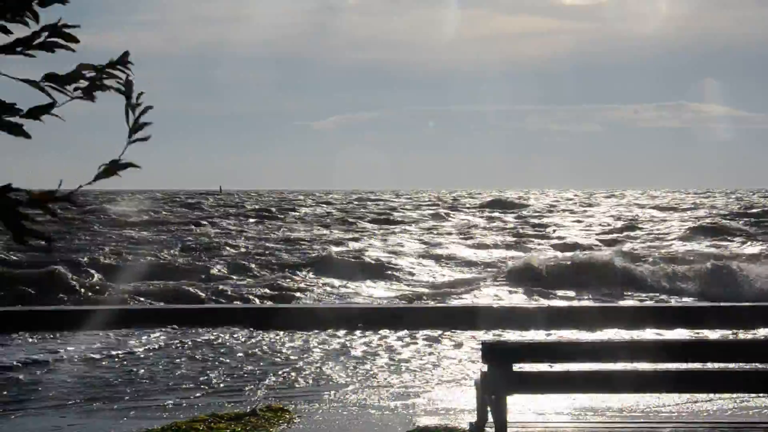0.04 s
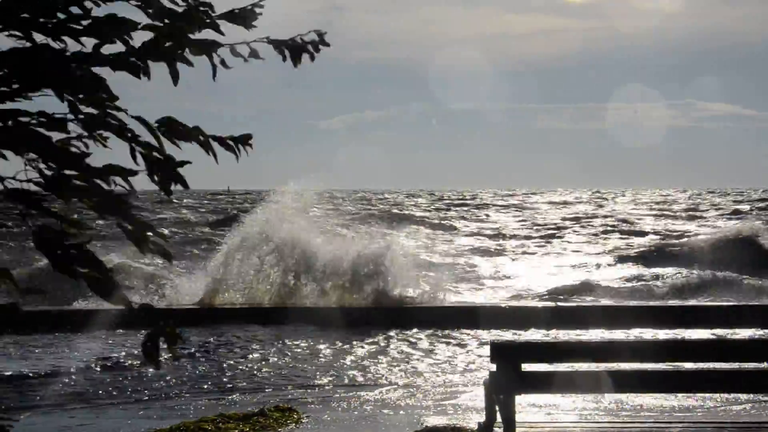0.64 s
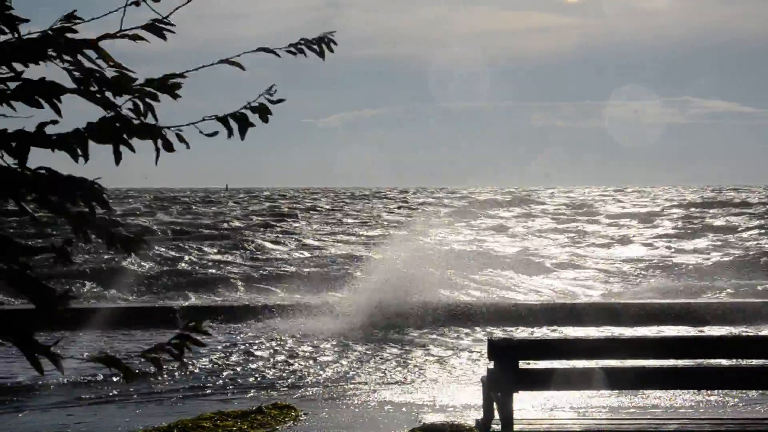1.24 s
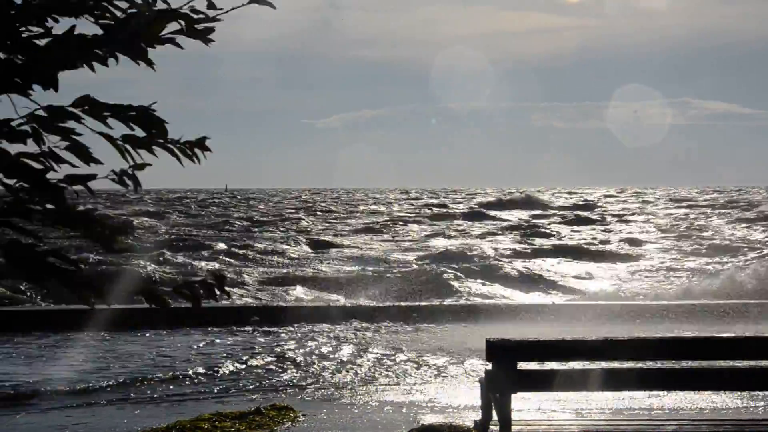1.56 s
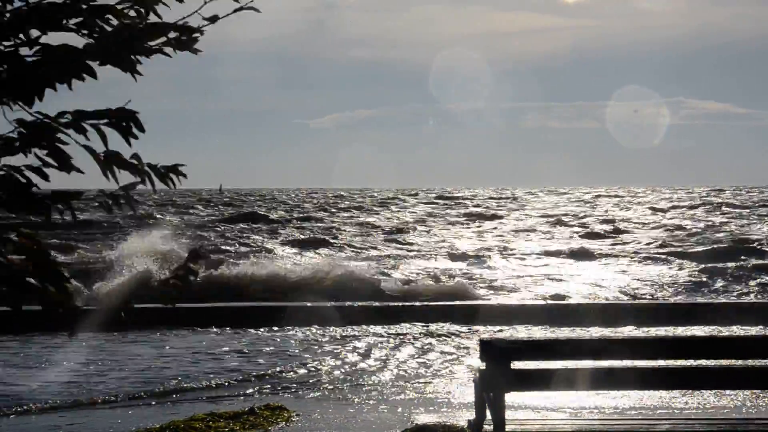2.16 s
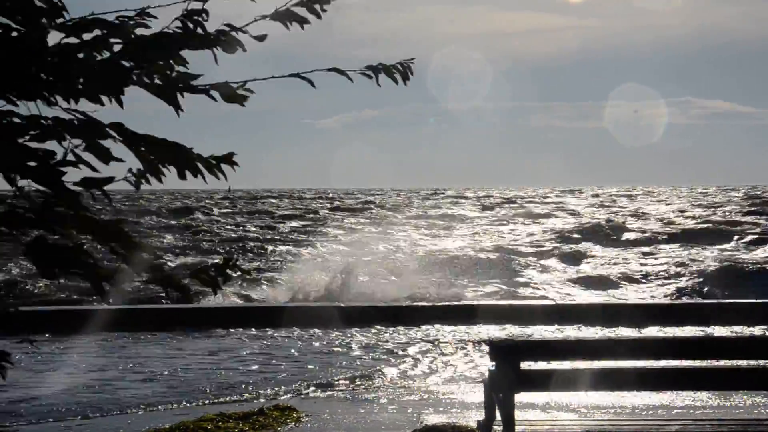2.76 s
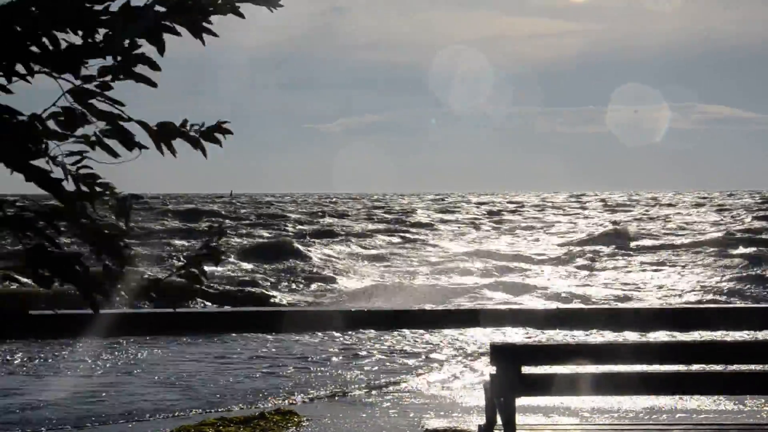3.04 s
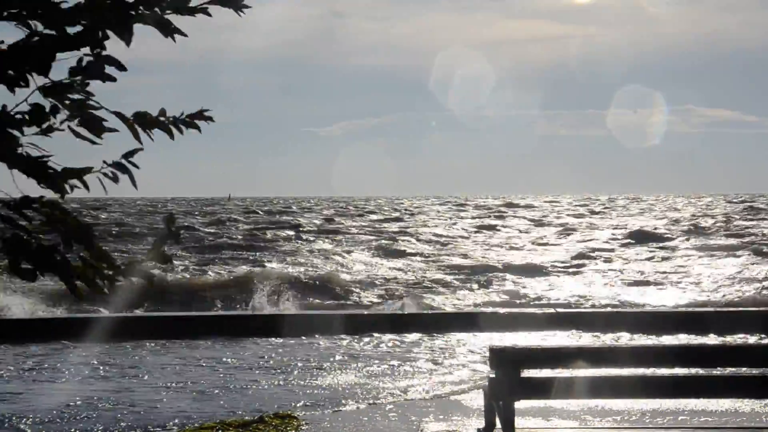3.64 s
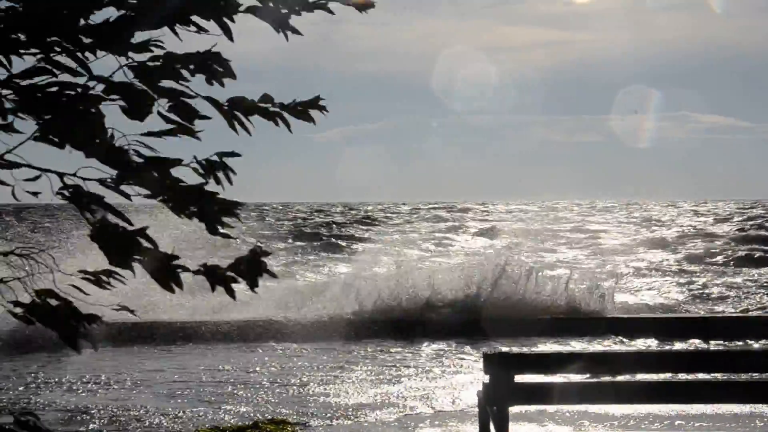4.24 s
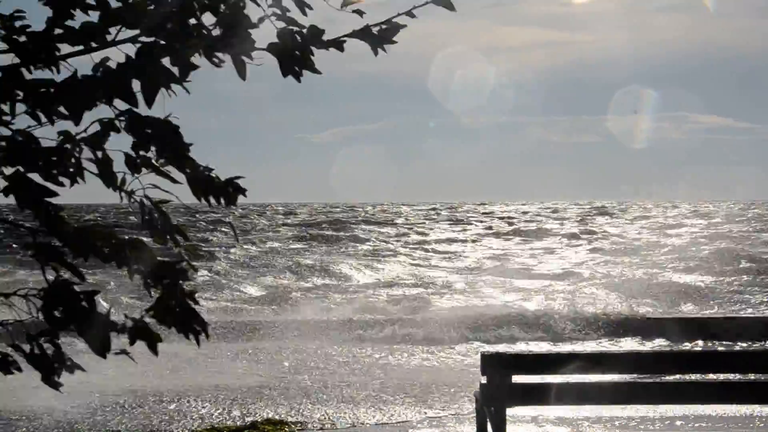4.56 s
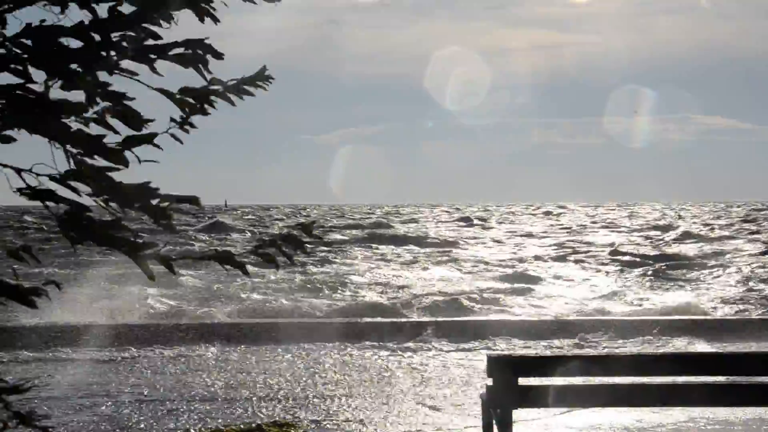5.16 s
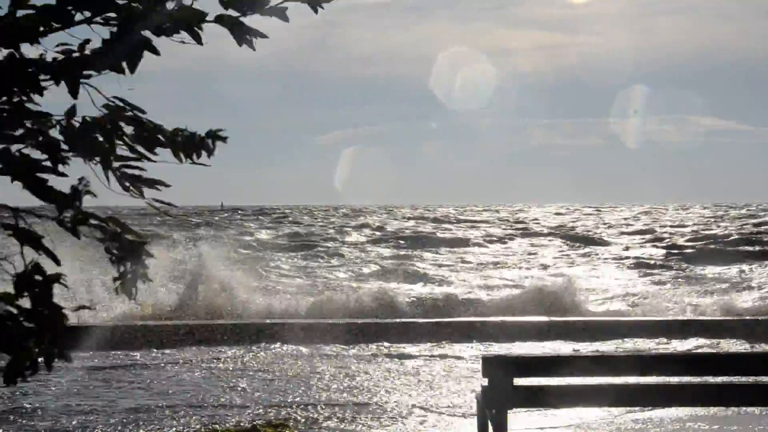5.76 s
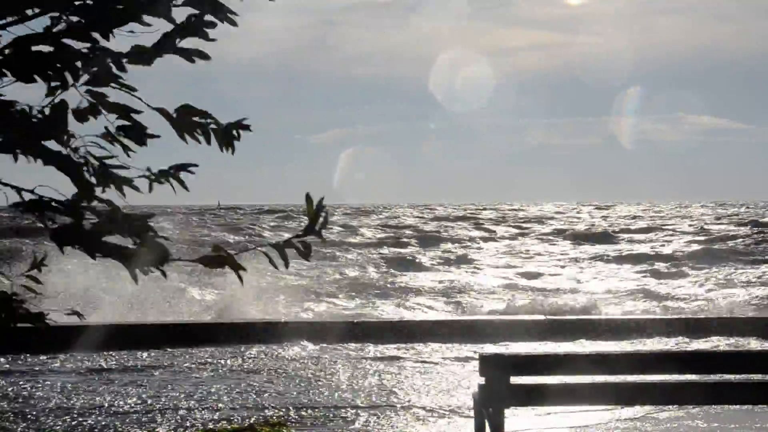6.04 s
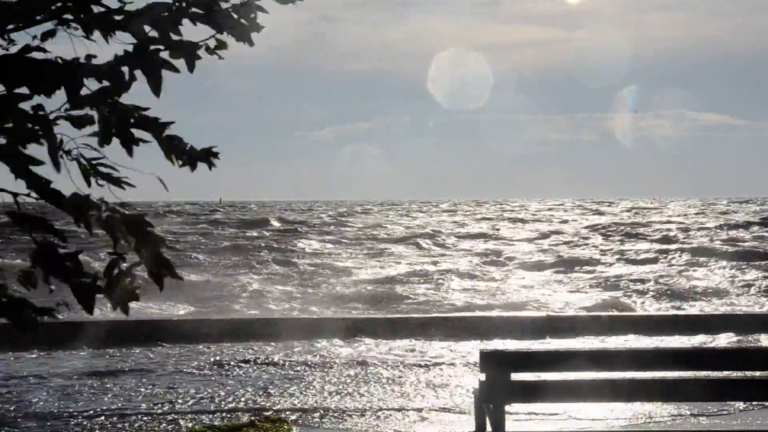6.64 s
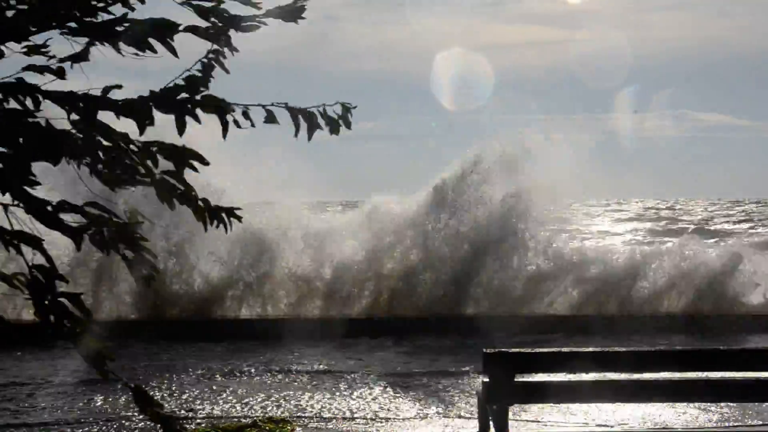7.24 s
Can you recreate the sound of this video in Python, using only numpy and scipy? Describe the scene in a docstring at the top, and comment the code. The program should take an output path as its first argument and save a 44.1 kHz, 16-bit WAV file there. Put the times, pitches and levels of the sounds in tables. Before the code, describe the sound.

Close, deep wind rumble and irregular thuds batter the microphone on an open seafront, with the continuous wash of stormy waves behind. The wind leans left at first, then shifts right and turns into ragged, rasping gusts with sharp snaps. Short lulls break up the buffeting, and the strongest blasts push the sound of the sea down for a moment before it returns.

```python
"""Storm surf and gale at a seawall

Surf roars as a steady wash with a hard ring near 2 kHz. A gale blows straight onto a small stereo
microphone: it rumbles on the ports, tears in gusts, drops into lulls and breaks into thumps, buffets
and pops. Each hard push makes the gain control duck everything; the surf then swells back."""
import sys
import numpy as np
from scipy import signal
from scipy.fft import rfft, irfft
from scipy.io import wavfile
from scipy.ndimage import uniform_filter1d, minimum_filter1d

SR = 44100
rng = np.random.default_rng(int(sys.argv[2]) if len(sys.argv) > 2 else 0)


def pcm_store(signal):
    """Save signal as 16-bit PCM."""
    levels = np.round(np.clip(np.atleast_2d(signal), -1, 1) * 32767)
    wavfile.write(sys.argv[1], SR, levels.astype(np.int16).T)


N = 325899
TIME_S = np.arange(N) / SR
FREQ_HZ = np.fft.rfftfreq(N, 1 / SR)


def from_db(db):
    """Decibels to amplitude."""
    return 10 ** (np.asarray(db) / 20)


def unit_rms(x):
    """Scales to rms 1."""
    return x / np.sqrt(np.mean(x ** 2) + 1e-20)


def curve(rows, column=1):
    """One column of a time table, at every sample."""
    rows = np.array(rows)
    return np.interp(TIME_S, rows[:, 0], rows[:, column])


def spectrum(rows, column=1):
    """One column of a frequency table, interpolated on a log axis."""
    rows = np.array(rows)
    return np.interp(np.log(FREQ_HZ + 1), np.log(rows[:, 0] + 1), rows[:, column])


def lowpass(x, corner_hz, order):
    """Zero-phase low-pass."""
    return irfft(rfft(x) / (1 + (FREQ_HZ / corner_hz) ** order), N)


def wander(rate_hz):
    """Smooth random drift of rms 1, rolling off above the rate."""
    return unit_rms(irfft(rfft(rng.standard_normal(N)) * np.exp(-(FREQ_HZ / rate_hz) ** 2), N))


def port_noise(colour_db, coherence, left_lead_rad=0):
    """Coloured noise of rms 1, partly shared by the two ports."""
    left, other = rfft(rng.standard_normal((2, N)))
    right = (coherence * left + np.sqrt(1 - coherence ** 2) * other) * np.exp(-1j * left_lead_rad)
    return unit_rms(irfft(np.array([left, right]) * from_db(colour_db), N))


def steady(x, span_samples):
    """Holds the power at 1 over the span and keeps faster detail."""
    window = np.hanning(span_samples)
    power = signal.fftconvolve((np.atleast_2d(x) ** 2).mean(0), window / window.sum(), "same")
    return x / np.sqrt(abs(power) + 1e-6)


def pan(left_minus_right_db):
    """Left and right gains for a level difference."""
    return from_db(np.array([[1], [-1]]) * left_minus_right_db / 2)


# Electrical tones. Each row: frequency in Hz, level in dB.
WHINE_TONES = [(14910, -91), (14970, -83), (15030, -82), (15090, -91)]


def whine(level_db=1, side_db=-13):
    """Close, faint, steady tones from the electronics."""
    tones = sum(from_db(db) * np.sqrt(2) * np.sin(2 * np.pi * hz * TIME_S) for hz, db in WHINE_TONES)
    return tones * from_db(level_db) * pan(side_db)


# Surf spectrum. Each row: frequency in Hz, left and right relative density in dB.
SURF_SPECTRUM = [(60, -60.5, -57.5), (247, -55, -52), (700, -57.5, -57), (1070, -57.5, -56.5),
                 (1530, -56.5, -54), (1902, -53, -48.5), (2670, -66, -61), (3140, -62, -62.5),
                 (4300, -70.5, -75.5), (5490, -76, -88), (6970, -81, -91.5), (9170, -90.5, -89.5),
                 (9630, -102, -102), (10600, -106, -105), (13800, -107, -96.5), (15600, -114, -103)]
# Surf across the ports. Each row: frequency in Hz, coherence 0-1, left lead in radians.
SURF_STEREO = [(200, 0.99, 0), (1000, 0.94, 0), (2160, 0.98, 0), (2720, 0.72, 0), (3320, 0.58, 0.44),
               (4270, 0.7, 1.52), (6000, 0.7, 1.16), (7500, 0.2, 1.5), (8700, 0.08, 0.53), (12900, 0, 1.9)]
# Surf loudness over time, with quick rises and dips. Each row: time in seconds, relative level in dB.
SURF_LEVELS = [(0, 5), (.45, -3), (.58, 0), (.75, 0), (.85, 2), (1.05, -1.9), (1.33, 3), (1.5, 1.5),
               (1.7, -0.8), (1.95, 1.3), (2.2, 0.9), (2.325, 2.4), (2.42, 2.2), (2.6, -.6), (2.73, -2.9),
               (2.8, -1.8), (3.1, -2), (3.25, -1), (3.55, -1.1), (3.72, 0), (3.86, 1.5), (4.1, 0.7),
               (4.9, -0.2), (5.1, -3), (5.25, 4), (5.5, 0), (5.8, 1), (6.05, 1.6), (6.22, 1), (6.35, -3),
               (6.55, 0.2), (7.1, 0), (7.29, 2.3), (7.36, 6.3)]
# Spray over the wall. Each row: time in seconds, treble gain in dB.
SPRAY_TREBLE = [(0, 0.5), (1.2, -1.7), (2.2, -0.5), (3.2, -1.5), (4.4, -0.5), (5.2, 0.5), (6.2, 0.5),
                (7.3, 0.5)]


def surf(level_db=-21, seethe_db=0.76, patchy_db=0.88, spray_hz=3600):
    """Countless bubbles merge into a wash; foam flares up in different bands and spray adds hiss."""
    colour_db = np.array([spectrum(SURF_SPECTRUM, 1), spectrum(SURF_SPECTRUM, 2)])
    wash = port_noise(colour_db, spectrum(SURF_STEREO, 1), spectrum(SURF_STEREO, 2))
    bands = signal.stft(wash, nperseg=512)[2]
    patches = uniform_filter1d(rng.standard_normal(bands.shape[1:]), size=7, axis=0)
    patches = unit_rms(uniform_filter1d(patches, size=12, axis=1))
    foam = unit_rms(signal.istft(bands * from_db(patchy_db * patches))[1][:, :N])
    body = lowpass(foam, spray_hz, order=6)
    roar = body + (foam - body) * from_db(curve(SPRAY_TREBLE))
    return roar * from_db(level_db + curve(SURF_LEVELS) + seethe_db * wander(rate_hz=21))


# Wind strength. Each row: time in seconds, rumble level in dB, flutter level in dB.
WIND_LEVELS = [(0.3, -12, -21.5), (0.62, -14, -23), (0.95, -9.5, -22), (1.25, -14, -25), (1.5, -15.5, -24),
               (2.31, -12.5, -21), (2.38, -9, -19), (2.9, -9.5, -21.5), (3.1, -12, -23.5), (3.88, -17, -24),
               (3.98, -9.5, -21.5), (4.4, -9, -14.5), (4.98, -9.5, -22), (5.19, -13.5, -38),
               (5.33, -6.5, -13), (5.6, -7.5, -12.5), (5.73, -11.5, -20.5), (6.2, -11.5, -15),
               (6.52, -11.5, -23), (6.95, -10.5, -21), (7.33, -9.5, -18.5)]
# Veer and eddy size. Each row: time in seconds, left minus right in dB, deep bass gain in dB.
WIND_VEER = [(.3, 4.5, 4), (.8, 6, 2.5), (1.3, 1.5, 8), (2.3, 5.5, 8), (2.8, 1.5, 4.5), (3.8, 3.3, 8),
             (4.2, -6.5, -3.5), (4.8, -4, -0.5), (5.3, -4.5, 4), (6.2, -3, -6), (7.3, -2.5, 4.5)]
# Large-eddy spectrum. Each row: frequency in Hz, relative density in dB.
RUMBLE_SPECTRUM = [(8, -24), (16, -18.5), (38, -4), (70, -2.5), (120, -7.5), (170, -11.5), (280, -20),
                   (500, -33.5), (1200, -97)]


def rumble(level_db=-1.5, lumpy_db=6, deep_hz=52, right_cut_hz=34, right_db=1):
    """Large slow eddies push in lumps and veer with the wind; the right port passes less deep bass."""
    push = port_noise(spectrum(RUMBLE_SPECTRUM), coherence=0.72)
    push *= from_db(lumpy_db * wander(rate_hz=20.3))
    push = steady(push, span_samples=3500) * from_db(level_db + curve(WIND_LEVELS, 1))
    deep = lowpass(push, deep_hz, order=4)
    left, right = (push - deep + deep * from_db(curve(WIND_VEER, 2))) * pan(curve(WIND_VEER, 1))
    right = irfft(rfft(right) * FREQ_HZ / np.hypot(FREQ_HZ, right_cut_hz), N)
    return np.array([left, from_db(right_db) * right])


# Spectrum of fully torn flow. Each row: frequency in Hz, relative density in dB.
TORN_SPECTRUM = [(60, -15.5), (160, 2), (350, -1), (600, -4.5), (900, -10), (1400, -15), (1900, -16.5),
                 (2500, -32), (3300, -36.5), (5000, -58), (9000, -82.5)]


def flutter(level_db=1.3, ragged_db=2.5, dull_hz=390, tearing_db=-14.5):
    """Smaller eddies shed in clumps: dull flapping when weak, tearing into the midrange when strong."""
    clumps = steady(from_db(ragged_db * wander(rate_hz=50)), span_samples=3500)
    force = clumps * from_db(level_db + curve(WIND_LEVELS, 2))
    bright = steady(port_noise(spectrum(TORN_SPECTRUM), coherence=0.81), span_samples=450)
    dull = lowpass(bright, dull_hz, order=2)
    tearing = 1 - np.exp(-force / from_db(tearing_db))
    return force * (dull + tearing * (bright - dull))


# Brief changes in the wind. Each row: centre in seconds, gain in dB, half-width in seconds.
WIND_LULLS = [(0.505, -4.5, 0.1), (0.924, 3, 0.012), (1.132, -3, 0.014), (1.216, -7, 0.0072),
              (1.272, -7, 0.018), (1.512, -15, 0.019), (1.64, -3, 0.013), (1.887, -6, 0.039),
              (2.447, -2, 0.0081), (2.548, -7, 0.018), (2.67, -12, .012), (2.77, 4, 0.0068),
              (2.846, -5, 0.014), (2.945, -6, .012), (3.086, -7.5, 0.029), (3.61, -7, 0.015),
              (3.777, -2, 0.019), (4.137, -4, .01), (4.22, -7, 0.0091), (4.289, -7, .012),
              (4.381, -5, 0.0084), (4.482, -12, 0.012), (4.604, -8.5, .012), (4.71, -10, 0.017),
              (5.103, -10, 0.06), (5.454, -5, .014), (5.768, -5, 0.0096), (5.922, -10, 0.023),
              (6.068, -3, .012), (6.495, -5.5, 0.041), (6.691, -4, 0.012), (6.853, -10.5, 0.021),
              (7.168, -17, 0.015), (7.26, -4.5, 0.009), (7.308, -10, 0.051)]


def lull_gain():
    """The wind drops away for a moment or, rarely, surges."""
    return from_db(sum(db * np.exp(-((TIME_S - centre_s) / width_s) ** 2)
                       for centre_s, db, width_s in WIND_LULLS))


# Single large eddies. Each row: centre in seconds, level in dB, swing in Hz.
THUMP_EDDIES = [(0.592, -7, 74), (0.669, -5.5, 79), (0.733, -2, 74), (.802, -10.5, 66), (0.875, 4.5, 82),
                (.998, -5, 94), (1.084, 3, 111), (1.166, -0.5, 107), (1.335, -5.5, 115), (1.386, -7.5, 63),
                (1.454, -8.5, 91), (1.595, -5, 70), (1.668, -5.5, 100), (1.776, 3, 83), (1.997, -1, 83.5),
                (2.058, -6.5, 83), (2.123, -16, 70), (2.18, -2, 88.5), (2.22, -7, 84), (2.339, 8.5, 78.4),
                (2.41, -1.5, 68.5), (2.477, 2, 87), (2.632, 0.5, 75.4), (2.754, 1, 69), (2.866, -5, 81),
                (2.9, -3.5, 96), (2.98, 0.5, 105), (3.173, -1, 107), (3.217, -11, 80), (3.321, -1.5, 86),
                (3.397, -3.5, 70), (3.492, -11, 95), (3.659, -6, 76), (3.712, -2, 97), (3.835, -7, 75),
                (3.897, -14, 98), (3.943, -8, 89), (4.197, -4.5, 96), (4.24, -2, 103), (4.274, -9.5, 130),
                (4.334, -4, 106), (4.658, -4.5, 91), (4.751, -6.5, 97), (4.789, -8.5, 120), (4.858, -5, 88),
                (4.933, -4, 118), (4.985, -3.5, 86), (5.218, -2, 78), (5.27, -2, 85), (5.369, -1.5, 114),
                (5.393, 3.5, 85), (5.484, -3.5, 123), (5.545, -3.5, 99), (5.599, 4, 98), (5.749, -4, 119),
                (5.849, -0.5, 110), (5.984, -7, 91), (6.093, -13, 144), (6.146, -3.5, 144),
                (6.218, -6, 154), (6.273, -3.5, 109), (6.371, -10, 137), (6.606, -1.5, 88),
                (6.665, -4, 103), (6.763, -8, 93), (6.813, -7, 88), (6.912, -3.5, 105), (6.971, -6, 111),
                (7, -6, 103), (7.038, -1.5, 97), (7.119, -8, 111), (7.204, -3, 93), (7.229, 2, 100),
                (7.29, -6, 77)]


def thumps(width_cycles=0.53, skew_rad=0.92, veer_share=0.9):
    """Each large eddy swings the pressure once or twice; the lee port gets it weaker and out of step."""
    out = np.zeros((2, N))
    draws = rng.uniform(-0.89, 1, (len(THUMP_EDDIES), 2))
    for (centre_s, db, hz), (half_turns, skew) in zip(THUMP_EDDIES, draws):
        width_s = width_cycles / hz
        near = abs(TIME_S - centre_s) < 3 * width_s
        t = TIME_S[near] - centre_s
        phase = 2 * np.pi * hz * t + np.pi * half_turns + skew_rad * skew * np.array([[1], [-1]])
        envelope = 0.5 ** (2 * (t / width_s) ** 2)
        out[:, near] += from_db(db) * np.sqrt(2) * envelope * np.sin(phase)
    sides = pan(veer_share * curve(WIND_VEER, 1))
    return out * sides / sides.max(0)


# Gust and buffet spectrum before the low-pass. Each row: frequency in Hz, relative density in dB.
PUFF_SPECTRUM = [(60, -18.5), (160, 2.5), (350, -0.5), (700, -4.5), (1400, -5.5), (1900, -5), (2500, -11.5),
                 (3300, -19), (5000, -38.5), (9000, -57.5)]


def turbulence(air, reach_hz):
    """Torn air of steady power; the smaller the eddies, the higher it reaches."""
    return steady(signal.lfilter(*signal.butter(2, reach_hz, fs=SR), air), span_samples=450)


# Tearing gusts. Each row: start in seconds, end in seconds, level in dB, reach in Hz.
GUST_SPANS = [(3.94, 4.124, -9.5, 600), (4.171, 4.204, -10.5, 850), (4.243, 4.374, -16, 600),
              (4.496, 4.518, -7.5, 554), (4.543, 4.563, -6.5, 1300), (4.749, 4.85, -13, 690),
              (4.925, 4.987, -13.5, 700), (5.266, 5.335, -12.5, 503), (5.496, 5.638, -11.5, 795),
              (5.813, 5.889, -11, 636), (6.085, 6.205, -17.5, 600), (6.215, 6.295, -18.5, 650),
              (6.4, 6.446, -15.5, 650), (6.62, 6.68, -19.5, 700), (6.89, 6.94, -12.5, 450),
              (6.99, 7.028, -11.5, 700)]


def gusts(level_db=-1.2, edge_s=0.0035, ragged_db=6, swing_db=2):
    """The flow tears loose from the ports, rattles while the gust holds, and settles again."""
    air = port_noise(spectrum(PUFF_SPECTRUM), coherence=0.76)
    out = np.zeros((2, N))
    for start_s, end_s, db, reach_hz in GUST_SPANS:
        near = (TIME_S > start_s - 10 * edge_s) & (TIME_S < end_s + 10 * edge_s)
        t = TIME_S[near]
        hold = (np.tanh((t - start_s) / edge_s) - np.tanh((t - end_s) / edge_s)) / 2
        out[:, near] += from_db(level_db + db) * hold * turbulence(air[:, near], reach_hz)
    rattle = from_db(ragged_db * wander(rate_hz=140)) * pan(swing_db * wander(rate_hz=20))
    return out * steady(rattle, span_samples=2200)


# Fast eddies. Each row: peak in seconds, level in dB, width in seconds, reach in Hz.
BUFFET_EDDIES = [(0.884, -1, 0.0093, 420), (0.961, -7.5, 0.011, 200), (1.163, -6.5, 0.0061, 250),
                 (1.328, -15, 0.0091, 555), (1.433, -12.5, 0.014, 500), (1.664, -14.5, 0.021, 450),
                 (1.776, -3.5, 0.014, 1000), (1.987, -13.5, 0.0056, 406), (2.458, -5.5, 0.008, 182),
                 (2.513, -5, 0.0068, 280), (2.603, -8.5, 0.004, 200), (2.702, -6, 0.004, 220),
                 (2.792, -3.5, 0.0098, 704), (2.828, -10, 0.014, 497), (2.898, -8, 0.0047, 403),
                 (3.428, -9.5, 0.0087, 380), (3.69, -10, 0.0077, 238), (4.02, -5.5, 0.0048, 500),
                 (4.15, -14, 0.0086, 550), (4.111, -12, .007, 1000), (4.338, -6, 0.0085, 550),
                 (4.361, -10, 0.0058, 600), (4.406, -7.5, 0.0058, 650), (4.417, -4.5, 0.0092, 446),
                 (4.444, -9, .009, 600), (4.567, -3, 0.0053, 1400), (4.724, -8, 0.005, 352),
                 (4.76, -12, .006, 840), (4.935, -11.5, 0.005, 800), (4.612, -2, 0.0054, 600),
                 (4.809, -7.5, 0.0094, 660), (4.992, -6, 0.0045, 400), (5.286, -5.5, 0.0064, 640),
                 (5.325, -0.5, 0.0058, 450), (5.427, -3.5, 0.0075, 500), (5.53, -5, 0.0039, 700),
                 (5.563, -10, 0.0063, 550), (5.592, -7, 0.0055, 900), (5.664, -6.5, 0.0055, 450),
                 (5.838, -13, 0.0052, 600), (6.026, -6.5, 0.0086, 400), (6.158, -9, 0.0078, 1000),
                 (6.325, -9, 0.009, 685), (6.589, -12.5, 0.0047, 800), (6.622, -8.5, 0.006, 520),
                 (6.67, -7.5, 0.0066, 280), (6.761, -6, 0.0082, 453), (6.973, -8.5, 0.006, 500),
                 (7.013, -8.5, 0.0063, 700), (7.228, -8.5, 0.013, 450)]


def buffets(rise_steepness=1.78, fall_steepness=0.49, side_db=2):
    """Fast eddies break on the ports as dull thuds or bright slaps, quick to rise, slower to pass."""
    air = port_noise(spectrum(PUFF_SPECTRUM), coherence=0.75)
    out = np.zeros((2, N))
    for peak_s, db, width_s, reach_hz in BUFFET_EDDIES:
        near = abs(TIME_S - peak_s) < 4 * width_s
        widths = (TIME_S[near] - peak_s) / width_s
        envelope = np.exp(-np.where(widths < 0, rise_steepness, fall_steepness) * widths ** 2)
        burst = envelope * turbulence(air[:, near], reach_hz)
        out[:, near] += from_db(db) * pan(side_db * rng.standard_normal()) * burst
    return out


def add_vortex(mix, start_s, db, start_hz, decay_s, phase_turns, side_db, pitch_halving_s=0.00268):
    """A vortex snaps across the ports: a few pressure swings that slow as they die."""
    first = round(start_s * SR)
    span = slice(first, first + 1500)
    t = np.maximum(TIME_S[span] - start_s, 0)
    turns = start_hz * pitch_halving_s * np.log1p(t / pitch_halving_s)
    envelope = np.minimum(turns * 2, 1) * np.exp(-t / decay_s)
    mix[:, span] += from_db(db) * pan(side_db) * envelope * np.sin(2 * np.pi * (turns + phase_turns))


# Single vortices. Each row: start in seconds, level in dB, starting pitch in Hz.
POP_VORTICES = [(1.7725, -5.5, 1480), (2.517, -4.5, 700), (2.5995, -3.5, 1390), (2.7005, -7, 1100),
                (2.7905, -4.5, 890), (3.1665, 1.5, 1450), (4.185, -7, 1470), (4.289, -3.5, 1490),
                (4.307, -4.5, 1760), (4.4015, -2.5, 1780), (4.4165, -1, 1600), (4.545, -5, 1900),
                (4.5735, -3, 1580), (4.6135, -2, 1510), (4.748, -8, 1500), (4.991, -8, 1200),
                (5.429, 0, 1220), (5.5015, -7, 1370), (5.5095, 2, 1810), (5.648, -3, 1190),
                (5.8405, -2.5, 1280), (5.889, -5, 900), (6.143, -8, 1200), (6.932, -3.5, 910),
                (7.012, -3.5, 1200)]


def pops(decay_s=0.0029, side_db=4):
    """Single vortices snap loudly, each a little to one side."""
    out = np.zeros((2, N))
    for start_s, db, hz in POP_VORTICES:
        phase_turns, side = rng.uniform(-1.02, 1, 2)
        add_vortex(out, start_s, db, hz, decay_s, phase_turns, side_db * side)
    return out


def crackle(per_s=130, level_db=-0.5, scatter_db=5, pitch_hz=(1100, 2900), decay_s=0.0014, side_db=4):
    """Small vortices shed while a gust holds make a rasp."""
    out = np.zeros((2, N))
    for start_s, end_s, gust_db, _ in GUST_SPANS:
        for slot_s in np.arange(start_s, end_s, 1 / per_s):
            at_s = slot_s + rng.random() / per_s
            if at_s < end_s:
                db = gust_db + level_db + scatter_db * rng.uniform(-1, 1)
                hz = rng.uniform(*pitch_hz)
                add_vortex(out, at_s, db, hz, decay_s, rng.random(), side_db * rng.uniform(-1, 1))
    return out


def scene():
    """Surf ahead, wind on the microphone; the ports dull the pops and crackle."""
    background = whine() + surf()
    wind = (rumble() + flutter()) * lull_gain() + thumps() + gusts() + buffets()
    snaps = lowpass(pops() + crackle(), corner_hz=2500, order=6)
    return background + wind + snaps


def gain_control(x, threshold_db=-7.5, attack_s=0.0019, release_s=0.23, trim_db=-1.33, step_db=0.13):
    """Ducks both channels in small steps when the louder one is too strong, then lets go."""
    power_db = 10 * np.log10(abs(uniform_filter1d(x ** 2, size=265)).max(0) + 1e-12)
    excess_db = np.maximum(power_db - threshold_db, 0)
    release = np.exp(TIME_S / release_s)
    held_db = np.maximum.accumulate(excess_db * release) / release
    pole = np.exp(-1 / (attack_s * SR))
    duck_db = signal.lfilter([1 - pole], [1, -pole], held_db)
    return x * from_db(trim_db - step_db * np.round(duck_db / step_db))


# Opening fade. Each row: time in seconds, gain in dB.
OPENING_FADE = [(.03, -63.5), (.04, -33.5), (.12, -31), (.22, -21.5), (.35, -2.5), (.52, 1)]


def record(dry, limiter_threshold=0.62, band_edge_hz=15780):
    """Gain control, a fast limiter for peaks that slip through, the opening fade and a band limit."""
    ducked = gain_control(dry)
    allowed_gain = 1 / np.maximum(abs(ducked).max(0) / limiter_threshold, 1)
    limiter_gain = uniform_filter1d(minimum_filter1d(allowed_gain, size=61), size=61)
    faded = ducked * limiter_gain * from_db(curve(OPENING_FADE))
    taps = signal.firwin(511, band_edge_hz, window=("kaiser", 9), fs=SR)
    return signal.oaconvolve(faded, taps[None], "same", axes=1)


dry = scene()
out = record(dry)
pcm_store(out)
```